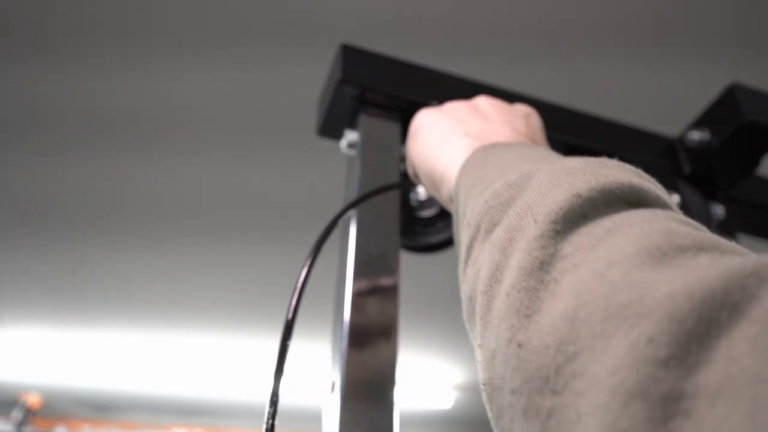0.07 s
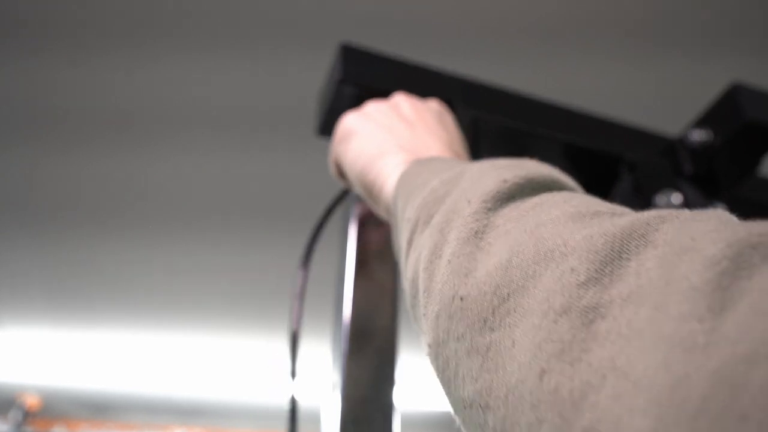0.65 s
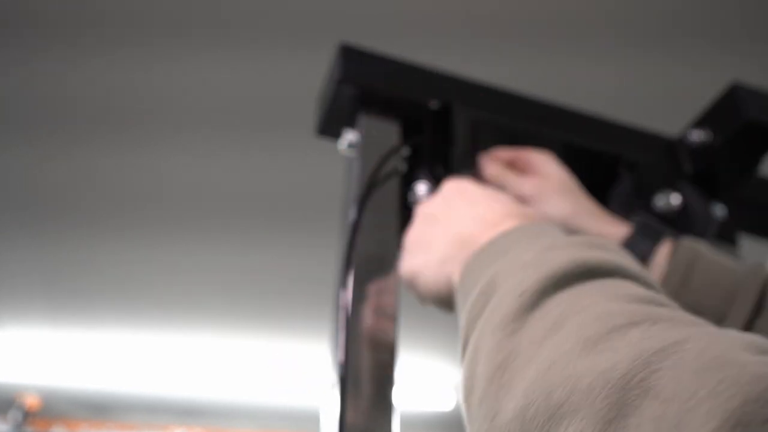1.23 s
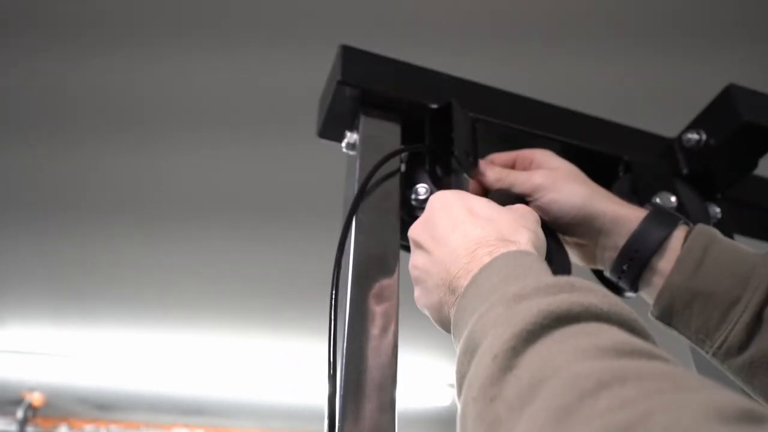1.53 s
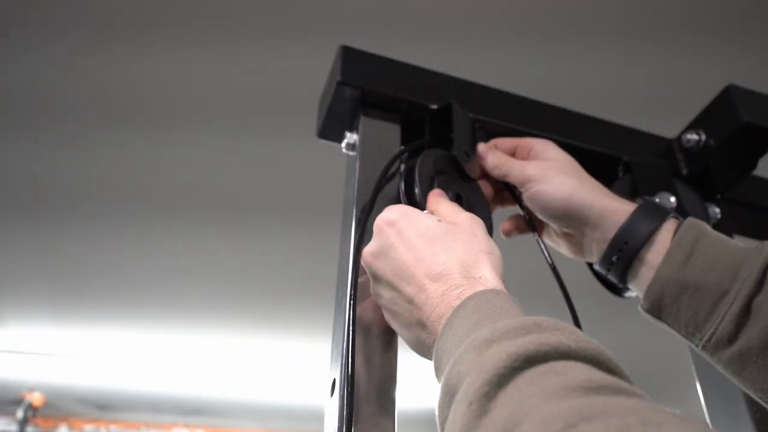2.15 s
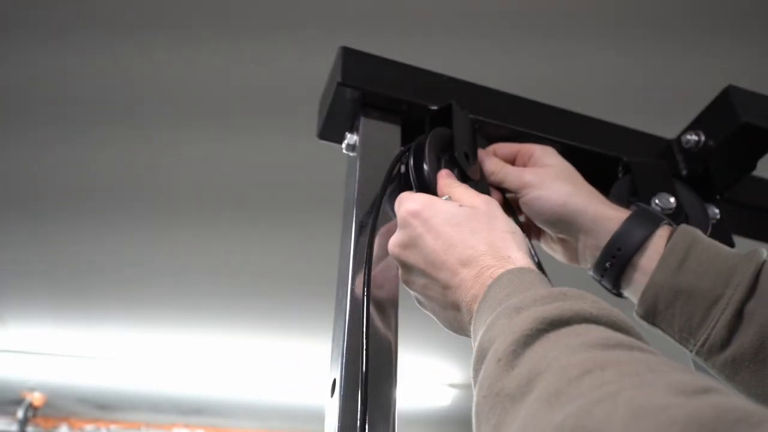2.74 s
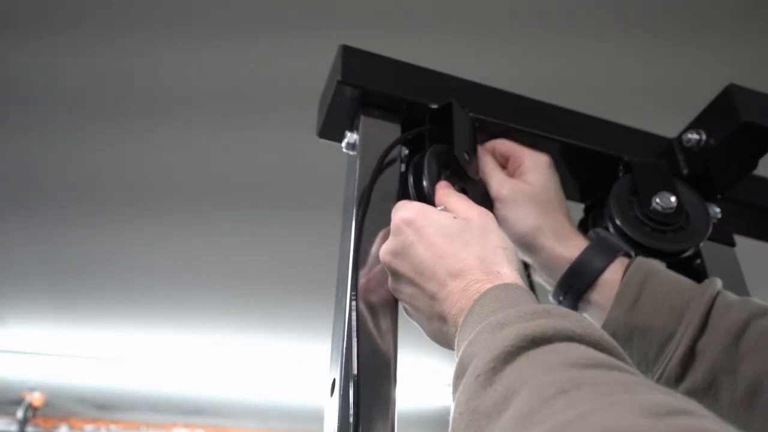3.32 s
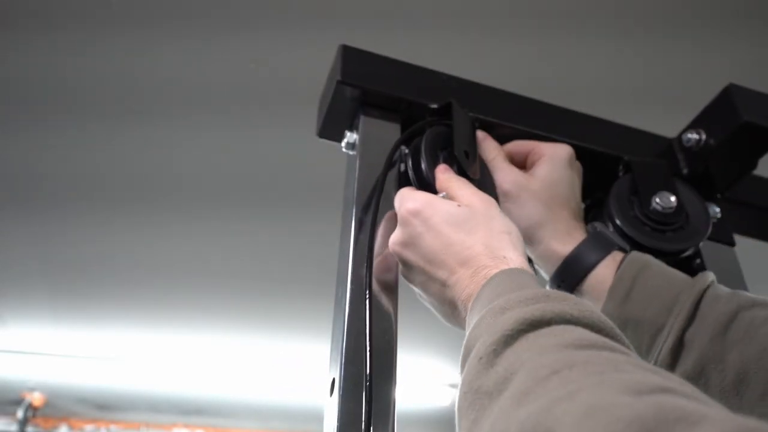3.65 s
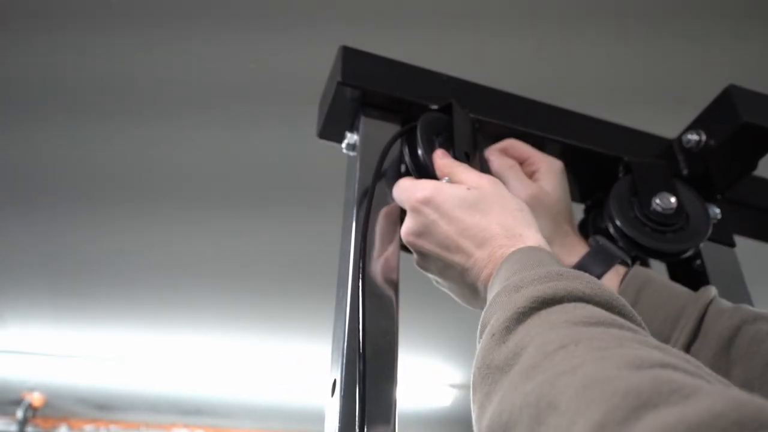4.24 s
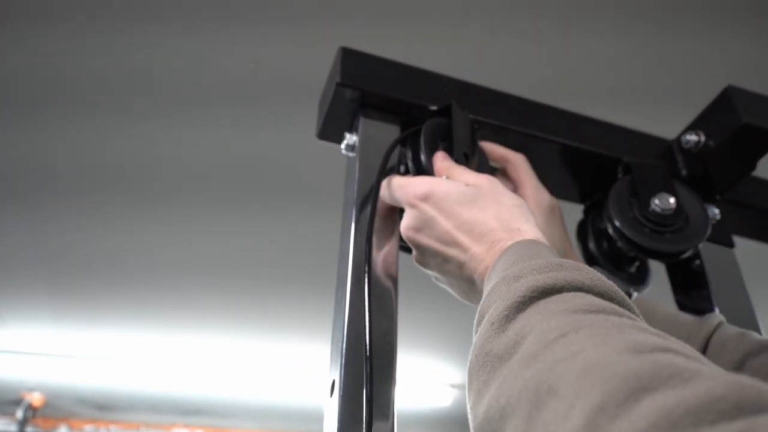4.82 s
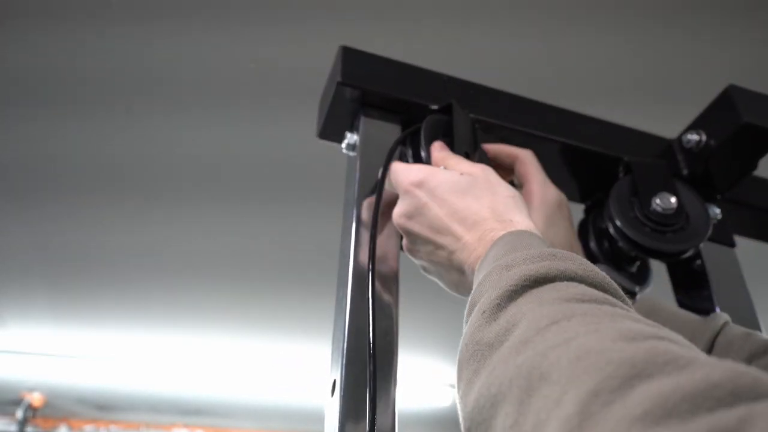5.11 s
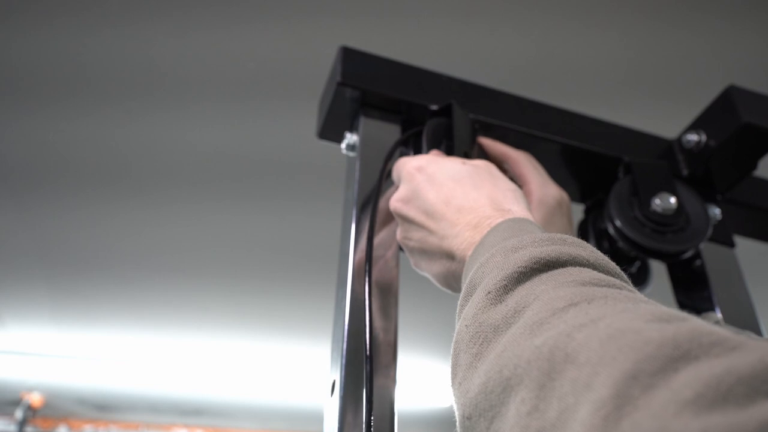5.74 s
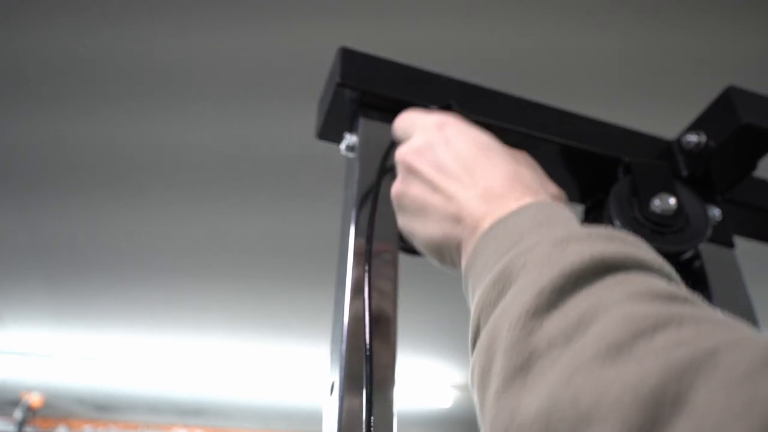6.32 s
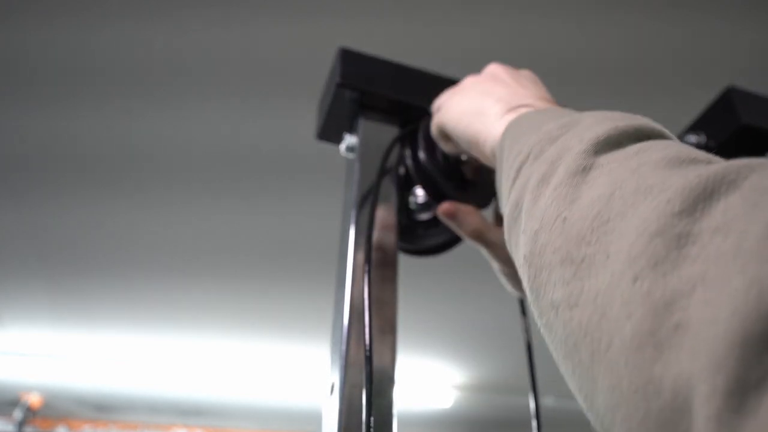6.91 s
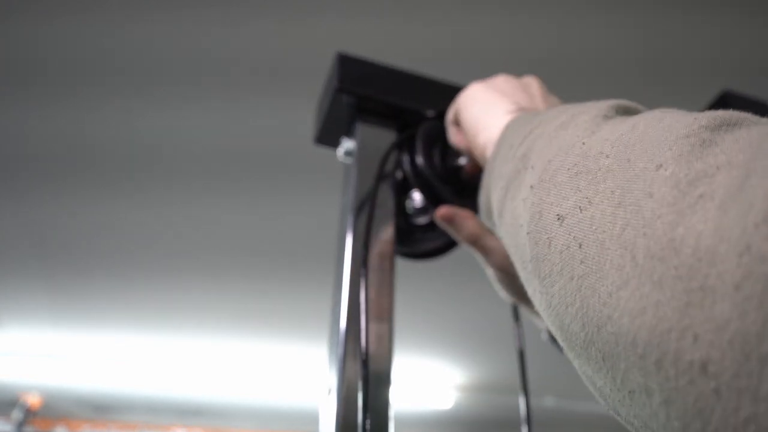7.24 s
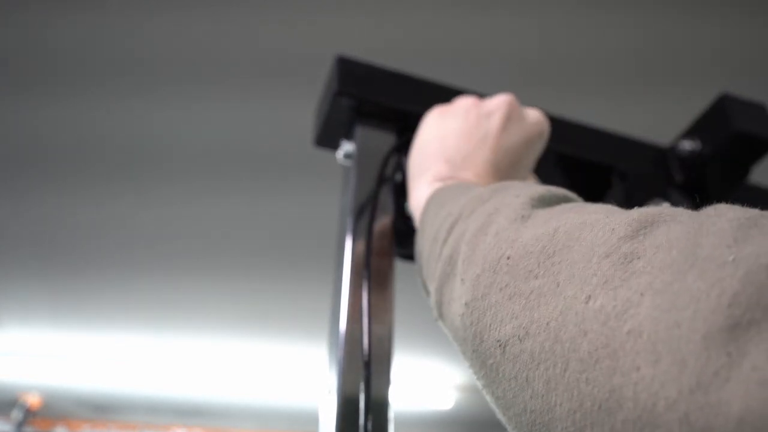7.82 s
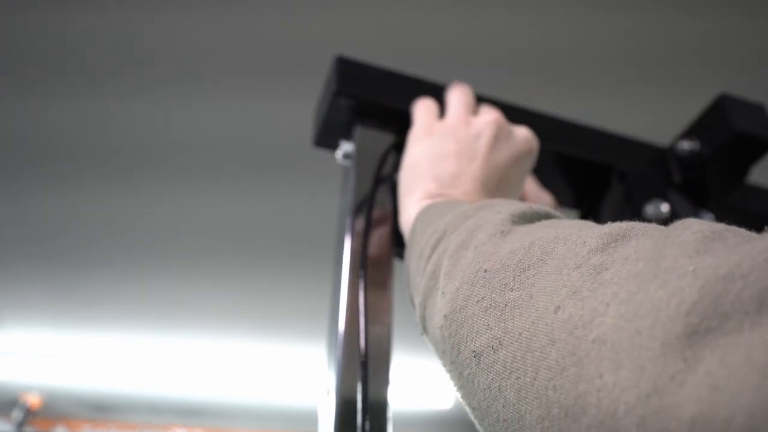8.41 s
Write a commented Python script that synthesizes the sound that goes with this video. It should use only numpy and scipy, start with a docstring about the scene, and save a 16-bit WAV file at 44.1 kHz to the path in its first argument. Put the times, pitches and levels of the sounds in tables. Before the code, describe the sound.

A pulley wheel softly knocks and rubs in its steel bracket, washers jingle, then a bolt clanks against the frame, harder and harder.

```python
"""A steel bolt and a cable pulley being fitted into the bracket of a gym machine, close up in a quiet room.
The bolt scrapes out of its hole; the wheel knocks, rubs and squeals between the plates, the cable
hisses through the groove and loose washers jingle. Then the bolt is worked back in and clanks against
the frame, harder and harder. Blows and stick-slip friction ring the modes of the metal.
Stereo microphones, the machine slightly to the left, a faint ventilation hum behind it."""
import sys
import numpy as np
from scipy import signal
from scipy.fft import rfft, irfft, next_fast_len
from scipy.io import wavfile

SR = 44100
rng = np.random.default_rng(int(sys.argv[2]) if len(sys.argv) > 2 else 0)


def output_pcm(signal):
    """Save a mono or channel-first signal as 16-bit PCM at the path in sys.argv[1].

    Samples are clipped to [-1, 1] before scaling.
    """
    pcm = np.clip(np.atleast_2d(signal).T, -1, 1) * 32767
    wavfile.write(sys.argv[1], SR, np.round(pcm).astype(np.int16))


N = 373527

# modes of the steel frame: pitch_hz, level_db, t60_s
FRAME_MODES = [(294, -9, .4), (672, -15, .35), (890, -9, .38), (1315, -10, .3), (1374, -3, .35),
               (1406, -7, .35), (1712, -12, .25), (2145, -11, .3), (2281, -8, .36), (2498, -8, .3),
               (2637, -5, .3), (2675, -4, .3), (2742, -4, .3), (3103, -4, .3), (3204, -1, .3),
               (3318, -4, .28), (3993, -6, .36), (4630, -14, .24), (6386, -8, .3), (7002, -6, .22)]
# dense ring between those modes: frequency_hz, level_db
FRAME_WASH = [(120, -66), (150, -37), (255, -40), (310, -6.5), (763, -7.5), (899, -1), (1370, -1),
              (1940, -2), (3190, 0), (4680, -4.5), (5520, -15), (7140, -1), (9060, -29), (14300, -21.5),
              (16000, -46)]
FRAME_WASH_DB = -1.5  # dense ring against the modes
# modes of the wheel in its bracket: pitch_hz, level_db, t60_s
WHEEL_MODES = [(309, -4, 0.47), (387, -3.5, 0.28), (470.5, -7.5, 0.39), (618, -14.5, 0.66),
               (652, -10.5, 0.34), (910, -11.5, 0.5), (2152, -3.5, 0.39), (2684, 3.5, 0.09),
               (2630, -7, 0.43), (2780, -12.5, 0.52), (6530, 5, 0.086), (12200, -9, 0.12)]
# dense ring of the wheel and bracket: frequency_hz, level_db
WHEEL_WASH = [(120, -51), (255, -21), (303, -3.5), (350, -3), (459, -8), (804, -11), (912, -7),
              (1780, -11.5), (2130, -3.5), (2650, -8), (3120, -16.5), (4390, -27), (6420, -12),
              (15000, -83.5)]


def bolt_clanks():
    """The bolt strikes the steel frame and sets it ringing."""
    # blows on the frame: start_s, crack_peak_db, ring_db, weight_db, hardness_db, favoured_hz
    clanks = [(6.961, -37.5, -64.5, -5, -28, 2560), (6.969, -38, -55, -9.5, -19, 1510),
              (7.035, -29, -54, -11, -13.5, 2200), (7.225, -38.5, -60.5, -13.5, -25, 1310),
              (7.288, -33.5, -56, -8.5, -20.5, 3730), (7.307, -31, -56, -4.5, -6.5, 3500),
              (7.484, -43.5, -66.5, -11, -2, 2281), (7.544, -39.5, -65.5, -3, -15, 1380),
              (7.569, -21, -49.5, -8.5, 5.5, 2520), (7.58, -28, -43, -7.5, -22.5, 910),
              (7.69, -37, -61, 2.5, -38, 1460), (7.896, -24, -47, -14, -2.5, 1370),
              (7.911, -36, -43, -9.5, -16, 917), (8.022, -30.5, -55, -2, -27, 1350),
              (8.071, -27.5, -50.5, 2, -15, 2090), (8.085, -26.5, -53, 3.5, -6, 2270),
              (8.173, -12.5, -44, -5, 6.5, 1290), (8.276, -9, -38, -11, -5.5, 3090)]
    return blows(clanks, FRAME_MODES, FRAME_WASH, FRAME_WASH_DB, crack_s=0.00074, rise_s=0.0014)


def bolt_grinding():
    """The thread chatters along the edge of the hole and rings the frame, more softly than a blow."""
    # twists of the bolt: start_s, length_s, level_db
    twists = [(5.68, 0.052, -62), (6.92, 0.059, -46), (8.08, 0.054, -41), (8.2, 0.044, -33.5)]
    soft_contact = [(400, -6.5), (1400, 4), (2600, -0.5), (3600, -7.5), (7000, -14)]
    frame = coloured(body(FRAME_MODES, FRAME_WASH, FRAME_WASH_DB), soft_contact)
    return scraped(strokes(twists, release_s=.008), frame, per_s=380, uneven_db=8.1)


def bolt_slide(bright_db=-9):
    """The shank scrapes out of its hole and sings in its own modes; the high ones need more pressure."""
    # modes of the bolt: pitch_hz, level_db, t60_s
    modes = [(1522, -6.5, 0.26), (1613, -0.5, 0.12), (1842, -4.5, 0.26), (2175, -8.5, 0.29),
             (2684, -6, 0.077), (3910, -13.5, 0.19), (5770, -24, 0.1), (6830, -17, 0.15),
             (11800, -28, 0.034)]
    # dense ring of the sliding bolt: frequency_hz, level_db
    wash = [(290, -54), (500, -14.5), (1570, -2.5), (1990, -18), (2190, 0.5), (4220, -17), (6970, -32),
            (14000, -45)]
    # one stroke out of the hole: start_s, length_s, level_db
    slides = [(.28, 0.225, -50)]
    shank = body(modes, wash, wash_db=-7.5)
    push = strokes(slides, release_s=0.0076)
    low = coloured(shank, [(2200, -2.5), (4000, -7)])
    high = coloured(shank, [(1800, -23), (3800, 4), (6800, 1.5)])
    dull = scraped(push, low, per_s=1500, uneven_db=4.3)
    bright = scraped(push ** 2 / push.max(), high, per_s=1500, uneven_db=3.5)
    return dull + amp(bright_db) * bright


def wheel_knocks():
    """The wheel knocks in its bracket and both ring."""
    # blows of the wheel: start_s, crack_peak_db, ring_db, weight_db, hardness_db, favoured_hz
    knocks = [(.794, -52, -65.5, -16, -2, 2400), (1.377, -62, -80, -27, -5, 2260),
              (1.968, -45, -66.5, 3, -10, 2830), (2.527, -52, -75.5, -0.5, -20, 900),
              (2.859, -65, -56.5, -4.5, 0, 3700), (3.245, -58, -77, -11, -8, 2630),
              (3.344, -47.5, -68, -28.5, 5.5, 2640), (3.524, -65, -79.5, 0, 0.5, 2140),
              (3.692, -65, -82, 6.5, -11, 1990), (4.01, -60, -83, 9, 3, 327),
              (5.223, -63, -82, 1, -5, 1070), (6.851, -49.5, -67, -12, -22, 2780)]
    return blows(knocks, WHEEL_MODES, WHEEL_WASH, wash_db=1, crack_s=0.00061, rise_s=0.0027)


def wheel_rubbing():
    """The wheel drags between the plates, slow slips groaning and fast ones squealing."""
    # drags of the wheel: start_s, length_s, groan_db, squeal_db
    drags = [(.13, 0.031, -74.5, -101), (1.97, 0.072, -53, -61), (2.1, 0.068, -57, -65.5),
             (2.26, 0.091, -62, -65.5), (2.37, 0.076, -59, -65), (2.94, 0.033, -48, -54.5),
             (3.35, 0.12, -74, -84), (3.53, 0.1, -70.5, -79), (3.69, 0.065, -72, -69.5),
             (3.78, 0.05, -64, -90), (4.49, 0.061, -73.5, -71.5), (4.77, 0.032, -67.5, -70.5),
             (5.68, 0.059, -59, -62), (5.95, 0.02, -70.5, -74)]
    wheel = body(WHEEL_MODES, WHEEL_WASH, wash_db=-6)
    low = coloured(wheel, [(280, -2.5), (470, 5), (650, 3.5), (900, 4), (1200, -13), (2000, -14)])
    high = coloured(wheel, [(700, -32.5), (1250, 11.5), (3100, -9.5), (5500, -12.5)])
    groan = scraped(strokes(drags, release_s=0.0119), low, per_s=300, uneven_db=1.7)
    squeal = scraped(strokes(drags, release_s=0.014, column=3), high, per_s=370, uneven_db=2.6)
    return groan + squeal


def rim_squeals(width_hz=260, fade_s=0.029):
    """Quick slips of the rim on the plate feed one narrow resonance, which glides as the grip shifts."""
    # squeals of the rim: start_s, length_s, level_db, first_hz, last_hz
    squeals = [(1.982, 0.22, -65.5, 2740, 2700), (2.383, 0.12, -68.5, 2690, 2760),
               (3.332, 0.114, -65, 2700, 2440), (3.507, 0.3, -78, 2560, 2090)]
    out = np.zeros((1, N))
    chatter = slips(per_s=700, uneven_db=7)[0]
    for start_s, length_s, level_db, first_hz, last_hz in squeals:
        t = np.arange(0, length_s, 1 / SR)
        hz = first_hz + (last_hz - first_hz) * t / length_s
        friction = chatter[round(start_s * SR):][:len(t)]
        song = resonate(resonate(friction, hz, width_hz), hz, width_hz)
        fade = np.minimum(np.minimum(t, length_s - t) / fade_s, 1)
        add(out, start_s, amp(level_db) * unit_rms(song) * fade)
    return in_room(out, wet_db=-4.5)


def washers(tick_lag_s=0.0075, fizz_db=-14):
    """Thin steel rings touch with a tick and a ping, and shiver in a fine chatter when shaken."""
    # loose washers touch: start_s, tick_peak_db, ping_db, upper_over_lower_note_db
    clinks = [(6.248, -41, -50, 0), (6.278, -31.5, -16.5, 1), (6.308, -43, -47, 3), (6.321, -60, -44, 15),
              (6.341, -46, -48, 6), (6.376, -43, -49, 40), (6.411, -46, -43, 17), (6.471, -42.5, -53, -3),
              (6.5177, -33, -36, -18), (6.615, -50, -70, -8), (7.827, -42, -56, -12),
              (8.068, -50, -44, -14), (8.174, -50, -37.5, 5), (8.277, -52, -38, 9)]
    # colour of their tick: frequency_hz, level_db
    tick_colour = [(1500, -47), (3200, -35), (5000, -25), (12000, -17), (13800, 0), (15500, -17)]
    # they shiver against each other: start_s, length_s, level_db
    shivers = [(6.28, 0.024, -39.5), (6.36, 0.027, -58), (6.47, 0.065, -60), (8.07, 0.058, -48.5),
               (8.17, .03, -46), (8.27, 0.014, -40)]
    out = np.zeros((1, N))
    for start_s, tick_db, ping_db, upper_db in clinks:
        add(out, start_s, amp(ping_db) * washer_ping(upper_db, t60_s=0.029, rise_s=0.0021))
        add(out, start_s + tick_lag_s, amp(tick_db) * snap(tick_colour, decay_s=0.0031))
    shake = strokes(shivers, release_s=0.029)
    ping = washer_ping(upper_db=5, t60_s=0.031, rise_s=0.00079)
    out += scraped(shake, ping[None], per_s=400, uneven_db=6.3)
    fizz = unit_rms(coloured(slips(per_s=300, uneven_db=4.46), tick_colour))
    out += amp(fizz_db) * shake * fizz
    return in_room(out, wet_db=-5)


def washer_ping(upper_db, t60_s, rise_s):
    """The pair of very high, quickly damped notes of a thin steel ring."""
    # lower and upper note of a washer: pitch_hz
    notes_hz = [13110, 14010]
    t = np.arange(SR // 5) / SR
    detune = 1 + .00067 * rng.standard_normal(2)
    notes = zip(notes_hz * detune, (-upper_db / 2, upper_db / 2))
    pair = sum(amp(db) * np.sin(2 * np.pi * hz * t) for hz, db in notes)
    return pair * amp(-60 * t / t60_s) * onset(t, rise_s)


def dry_ticks():
    """Cable and fingers tick on the wheel: small hard contacts that ring nothing but the room."""
    # contacts on the wheel: start_s, peak_db, centre_hz
    ticks = [(1.6879, -33.5, 6600), (2.011, -59, 7200), (2.365, -59, 7000), (2.468, -56, 6700),
             (2.8597, -36.5, 7300), (3.772, -54.5, 6600), (4.012, -40.5, 7100), (4.443, -66.5, 6900),
             (5.466, -70, 7050), (6.2232, -51, 14460), (7.4835, -35, 13240), (7.7662, -52, 10900)]
    out = np.zeros((1, N))
    for start_s, peak_db, hz in ticks:
        colour = [(300, -34), (2000, -12), (hz * .6, -16), (hz * .85, -3),
                  (hz, 0), (hz * 1.25, -10), (hz * 2, -27)]
        add(out, start_s, amp(peak_db) * snap(colour, decay_s=.002))
    return in_room(out, wet_db=-5)


def cable_hiss():
    """The plastic sheath of the cable hisses and catches as it slides through the groove."""
    # pulls on the cable: start_s, length_s, level_db
    pulls = [(1.38, 0.13, -81.5), (1.58, 0.078, -69), (1.99, .035, -76), (2.09, .06, -74),
             (2.28, 0.087, -74), (2.38, 0.071, -63), (2.95, 0.051, -62.5), (3.31, .05, -70.5),
             (3.55, 0.062, -79.5), (3.965, 0.038, -60.5), (4.49, 0.05, -76.5), (4.6, 0.067, -64),
             (4.72, 0.097, -63.5), (4.84, 0.15, -77.5), (5.03, 0.061, -69), (5.56, 0.015, -77),
             (5.68, 0.052, -60.5), (5.88, 0.099, -81)]
    # colour of the sheath's hiss: frequency_hz, level_db
    sheath_colour = [(1760, -60), (3000, -31.5), (3570, -9), (4630, -20), (6480, 7), (7720, -0.5),
                     (13400, -19), (16000, -14)]
    hiss = unit_rms(coloured(slips(per_s=1300, uneven_db=2.5), sheath_colour))
    return in_room(strokes(pulls, release_s=0.0086) * hiss, wet_db=-3.5)


def room_tone(air_db=-77, waver=0.021):
    """Faint air and the low, wavering hum of ventilation."""
    # colour of the quiet room: frequency_hz, level_db
    air_colour = [(32, -46.5), (55, -6), (136, -10.5), (223, -22), (359, -22), (563, -29), (2180, -33.5),
                  (4340, -37), (6650, -36), (14900, -41.5), (16000, -59.5)]
    # tones of the ventilation: pitch_hz, rms_db
    hum_tones = [(44.8, -70.5), (91.5, -84), (118.4, -85)]
    t = np.arange(N) / SR
    knots_s = np.arange(0, 9, 1 / 8)
    drift = 1 + waver * np.interp(t, knots_s, rng.standard_normal(len(knots_s)))
    drifting_t = np.cumsum(drift) / SR
    hum = sum(np.sqrt(2) * amp(db) * np.sin(2 * np.pi * hz * drifting_t) for hz, db in hum_tones)
    return hum + amp(air_db) * unit_rms(coloured(diffuse(N), air_colour))


def blows(rows, modes, wash, wash_db, crack_s, rise_s, favour_db=7, favour_octaves=0.17):
    """Each blow is a short crack and a long ring, coloured by its weight, hardness and point of contact."""
    # weight acts on the bass, hardness on the treble: full_weight_hz, flat_from_hz, flat_to_hz, full_hard_hz
    knees_hz = [500, 2000, 3000, 6500]
    out = np.zeros((2, N))
    t = np.arange(SR // 2) / SR
    crack_age = t[:SR // 30] / crack_s
    hz = np.geomspace(100, 16000, 80)
    for start_s, peak_db, ring_db, weight_db, hardness_db, favoured_hz in rows:
        slope_db = np.interp(np.log(hz), np.log(knees_hz), [weight_db, 0, 0, hardness_db])
        # the point of contact lifts the modes near one pitch
        lift_db = favour_db * np.exp(-(np.log2(hz / favoured_hz) / favour_octaves) ** 2)
        force = np.column_stack([hz, slope_db + lift_db])
        ringing = body(modes, wash, wash_db) * onset(t, rise_s)
        contact = rng.standard_normal(len(crack_age)) * crack_age ** 3 * np.exp(-crack_age)
        crack = coloured(coloured(coloured(contact, wash), wash), force)
        add(out, start_s, amp(ring_db) * coloured(ringing, force))
        add(out, start_s, amp(peak_db) * crack / abs(crack).max())
    return out


def body(modes, wash, wash_db):
    """Distinct modes over a dense ring of the structure and the room."""
    distinct = unit_rms(ring(modes))
    dense = unit_rms(coloured(room_tail(), wash))
    return unit_rms(distinct + amp(wash_db) * dense)


def ring(modes, scatter_db=3, spread=.009, detune=.0018):
    """Free ring of a body; each grip and contact point favours and shifts other modes."""
    hz, db, t60_s = np.transpose(modes)[:, :, None]
    t = np.arange(SR // 2) / SR
    strength, phase, skew, shift = rng.standard_normal((4, len(hz), 1))
    decay = amp(db + scatter_db * strength - 60 * t / t60_s)
    waves = decay * np.exp(2j * np.pi * (hz * (1 + detune * shift) * t + phase))
    # high modes differ more in phase between the microphones
    microphones = np.exp(1j * spread * (np.sqrt(hz) * skew).T * np.array([[1], [-1]]))
    return (microphones @ waves).imag * onset(t, rise_s=.001)


def snap(colour, decay_s):
    """A tiny burst of coloured noise with peak 1."""
    t = np.arange(SR // 50) / SR
    burst = coloured(rng.standard_normal(len(t)) * np.exp(-t / decay_s), colour)
    return burst / abs(burst).max()


def strokes(rows, release_s, column=2):
    """Pressure over the whole scene: each stroke builds evenly to its level and dies away once released."""
    out = np.zeros((1, N))
    for row in rows:
        start_s, length_s = row[:2]
        t = np.arange(0, length_s + 10 * release_s, 1 / SR)
        press = np.minimum(t / length_s, 1)
        release = np.exp(-np.maximum(t - length_s, 0) / release_s)
        add(out, start_s, amp(row[column]) * press * release)
    return out[0]


def slips(per_s, uneven_db):
    """Stick and slip: a train of tiny clicks, a few of them much larger."""
    at = np.flatnonzero(rng.random(N) < per_s / SR)
    size = rng.exponential(1, N)[at]
    sign = rng.choice([-1, 1], N)[at]
    train = np.zeros((1, N))
    train[0, at] = sign * amp(uneven_db * np.minimum(size, 4))
    return unit_rms(train)


def scraped(pressure, response, per_s, uneven_db):
    """Slips keep a body ringing; it rings on when the pressure ends."""
    friction = pressure * slips(per_s, uneven_db)
    return signal.oaconvolve(friction, response / np.linalg.norm(response[0]), axes=1)[:, :N]


def resonate(x, hz, width_hz):
    """A resonance that follows the pitch curve hz."""
    carrier = np.exp(2j * np.pi * np.cumsum(hz) / SR)
    pole = np.exp(-np.pi * width_hz / SR)
    return 2 * (carrier * signal.lfilter([1 - pole], [1, -pole], x / carrier)).real


def in_room(x, wet_db):
    """The direct sound at the microphones and the room's answer 4 ms later."""
    echo = np.pad(room_tail(), ((0, 0), (SR // 250, 0)))
    return x + amp(wet_db) * signal.oaconvolve(x, echo / np.linalg.norm(echo[0]), axes=1)[:, :N]


def room_tail():
    """Half a second of diffuse sound in which the treble dies first."""
    # decay of the room: frequency_hz, t60_s
    decay_times = [(250, 0.9), (1000, 0.48), (3000, 0.41), (7000, 0.28), (14000, 0.19)]
    hz, t, spectrum = signal.stft(diffuse(SR // 2), SR, nperseg=256)
    decay = amp(-60 * t / value_at(decay_times, hz)[:, None])
    return signal.istft(spectrum * decay, SR, nperseg=256)[1][:, :SR // 2]


def diffuse(size):
    """Noise at the two microphones, alike in the bass and less so in the treble."""
    # likeness of left and right in the room: frequency_hz, coherence (0-1)
    likeness = [(200, 0.88), (600, 0.58), (1200, 0.52), (2800, 0.34), (6000, 0.217), (14000, 0.33)]
    padded = next_fast_len(size)
    mid, side = rfft(rng.standard_normal((2, padded)))
    coherence = np.clip(value_at(likeness, np.fft.rfftfreq(padded, 1 / SR)), 0, 1)
    mid *= np.sqrt((1 + coherence) / 2)
    side *= np.sqrt((1 - coherence) / 2)
    return irfft(np.array([mid + side, mid - side]), padded)[:, :size]


def coloured(x, points):
    """Minimum-phase filter through points of frequency_hz, gain_db."""
    log_gain = np.log(amp(value_at(points, abs(np.fft.fftfreq(4096, 1 / SR)))))
    taps = np.fft.ifft(np.exp(signal.hilbert(log_gain).conj())).real[:2048]
    return signal.oaconvolve(np.atleast_2d(x), taps[None], axes=1)[:, :x.shape[-1]]


def value_at(points, hz):
    """Interpolates points of frequency_hz, value on a log-frequency axis."""
    points_hz, values = np.transpose(points)
    return np.interp(np.log(hz + 1), np.log(points_hz + 1), values)


def onset(t, rise_s):
    """A smooth rise from 0 to 1."""
    return 1 - np.exp(-(t / rise_s) ** 2)


def amp(db):
    """Decibels to gain."""
    return 10 ** (np.asarray(db) / 20)


def unit_rms(x):
    """Scales to rms 1."""
    return x / np.sqrt(np.mean(x ** 2) + 1e-20)


def add(mix, start_s, sound):
    """Mixes a sound in at start_s."""
    part = mix[:, round(start_s * SR):][:, :sound.shape[-1]]
    part += sound[..., :part.shape[1]]


def scene():
    """The machine stands close to the microphones, slightly to the left."""
    # how much more the left microphone hears: frequency_hz, left_over_right_db
    leftward = [(100, 0.8), (2200, 2.2), (4000, 0.5), (8000, 1.5), (14000, -2)]
    left, right = (wheel_knocks() + bolt_clanks() + dry_ticks() + washers() + bolt_slide()
                   + wheel_rubbing() + rim_squeals() + cable_hiss() + bolt_grinding() + room_tone())
    lean = np.array(leftward)
    return np.vstack([coloured(left, lean * [1, .5]), coloured(right, lean * [1, -.5])])


def record(dry):
    """The recorder's band limit, a steep low-pass at 16.2 kHz."""
    low_pass = signal.firwin(401, 16200, window=("kaiser", 9), fs=SR)
    return signal.oaconvolve(dry, low_pass[None], "same")


dry = scene()
out = record(dry)
output_pcm(out)
```